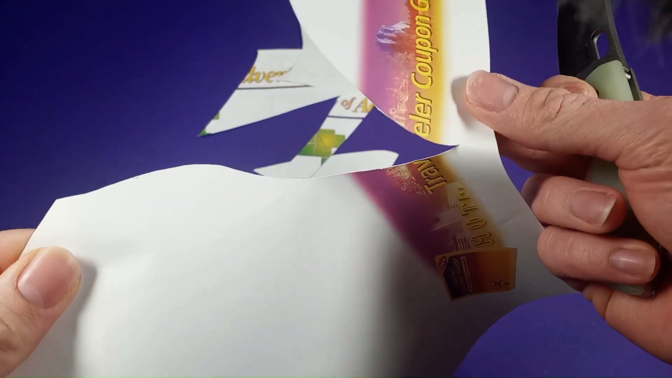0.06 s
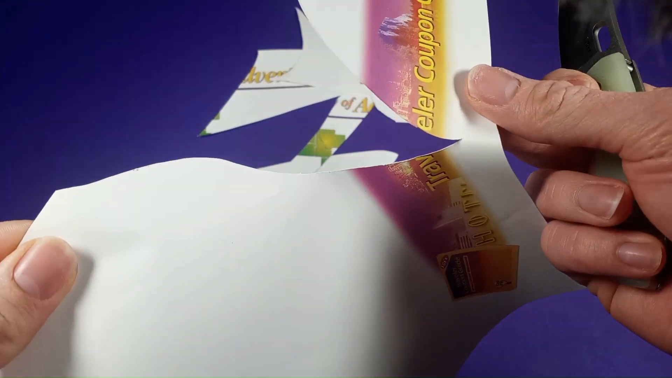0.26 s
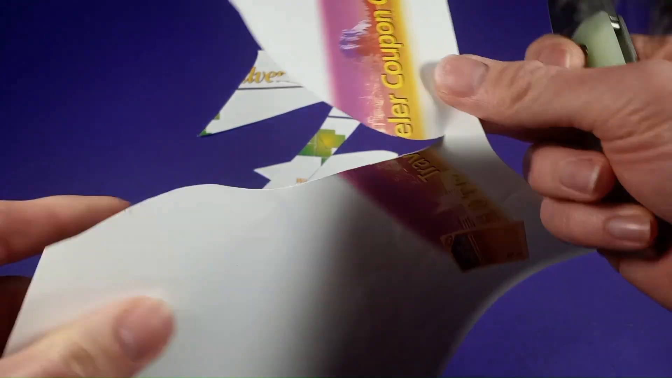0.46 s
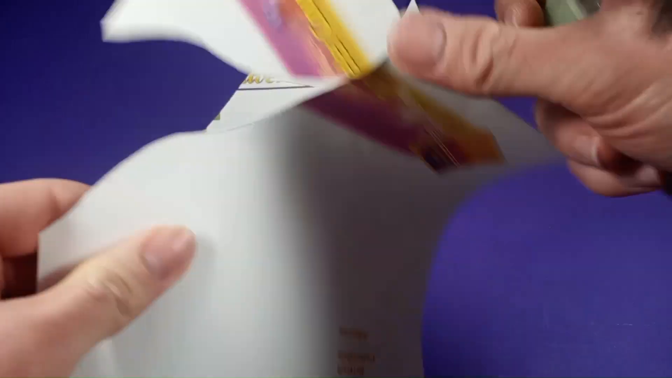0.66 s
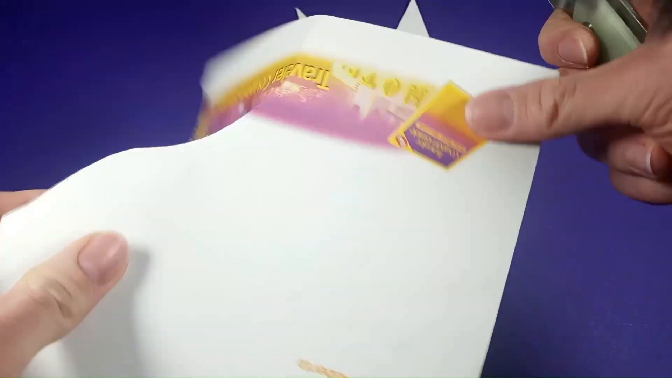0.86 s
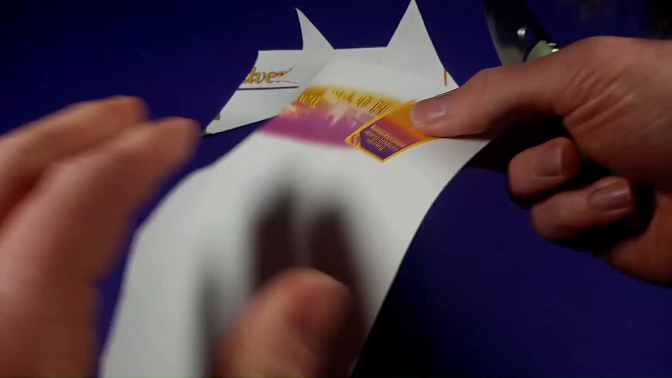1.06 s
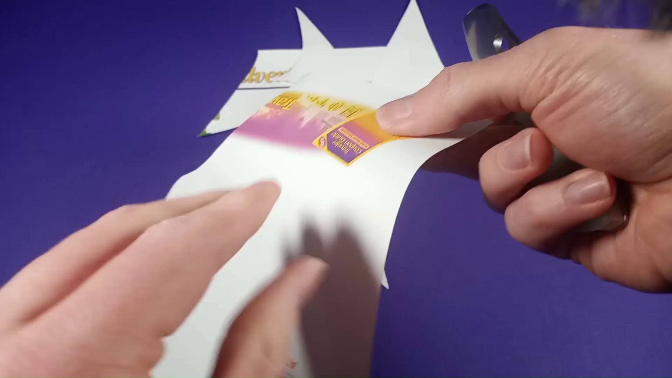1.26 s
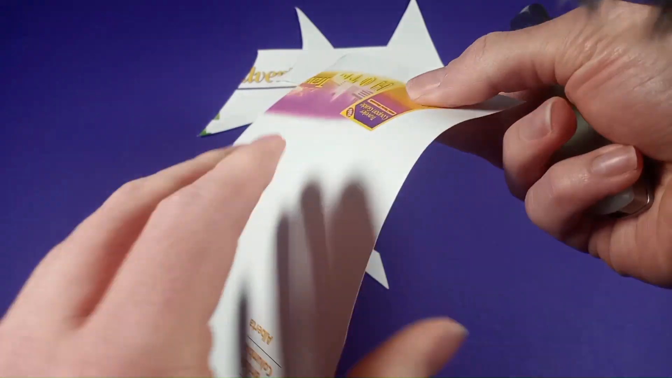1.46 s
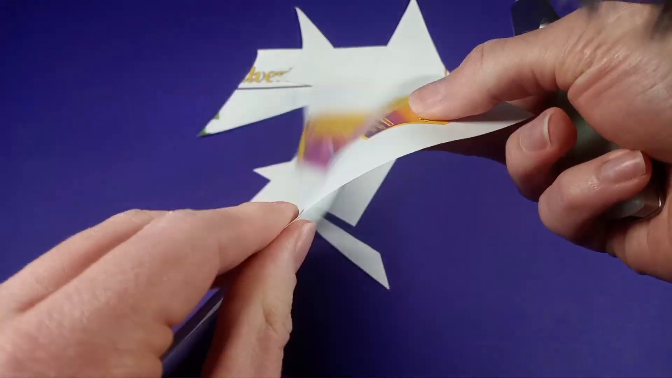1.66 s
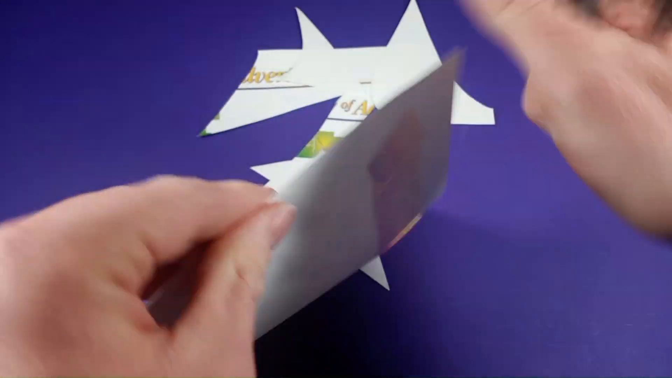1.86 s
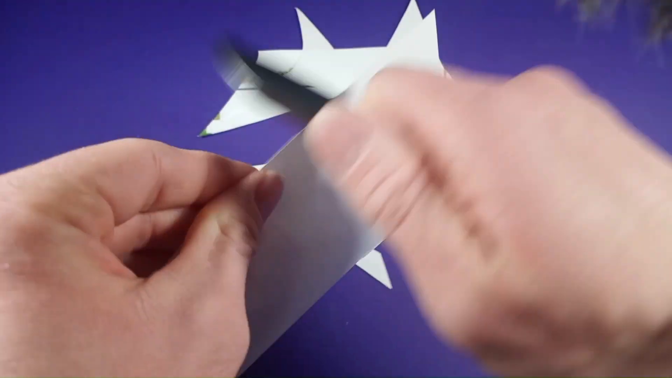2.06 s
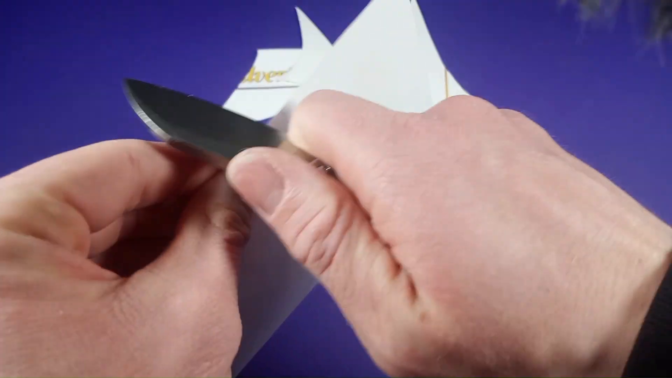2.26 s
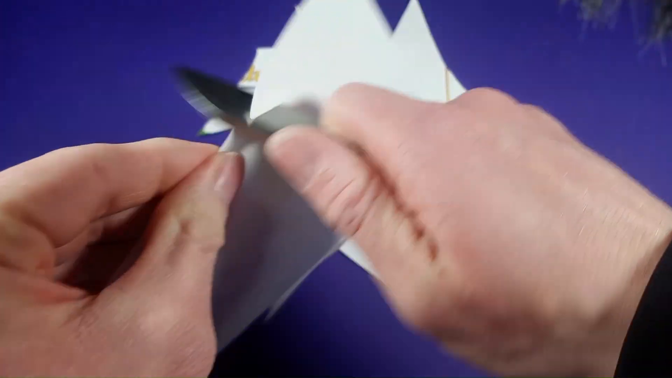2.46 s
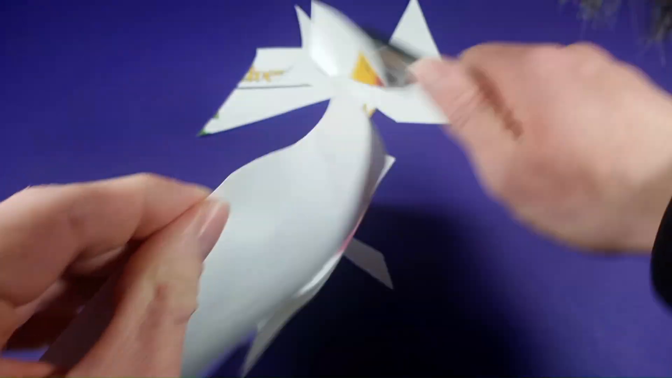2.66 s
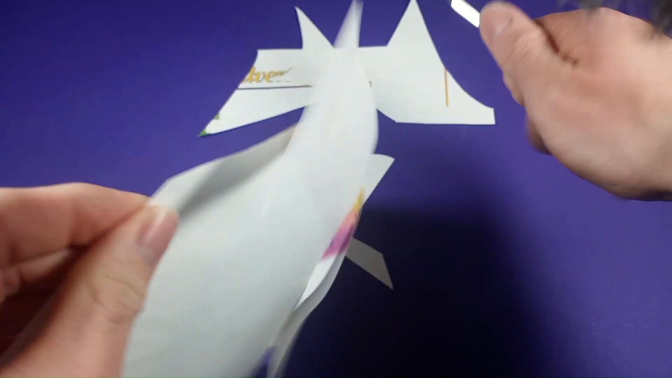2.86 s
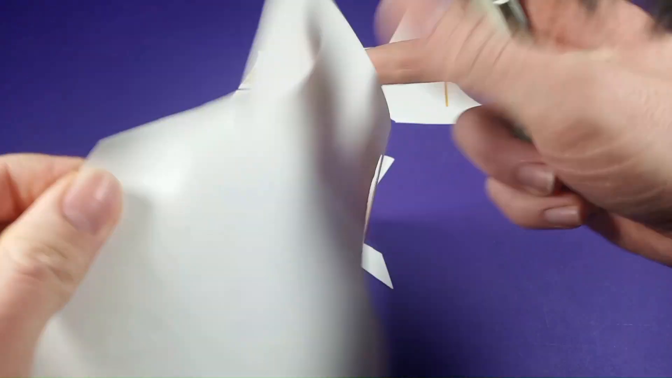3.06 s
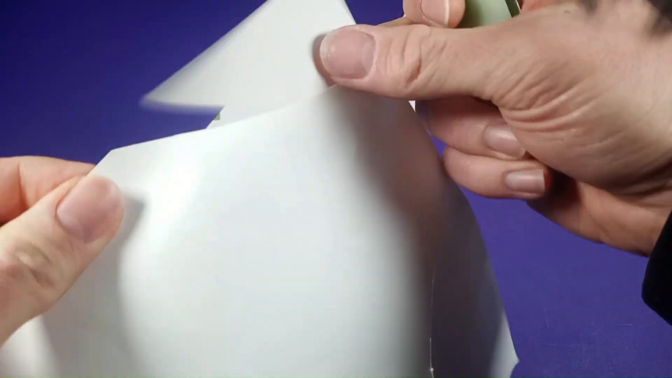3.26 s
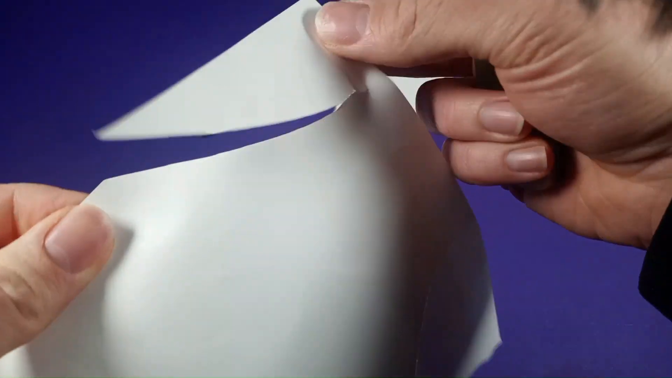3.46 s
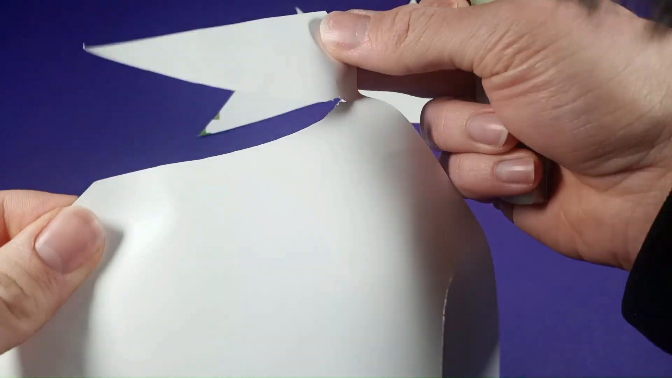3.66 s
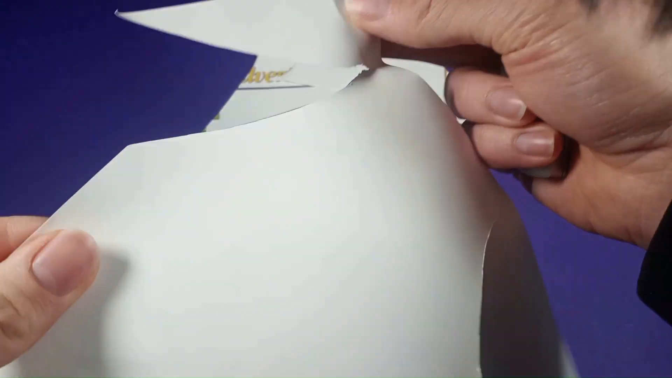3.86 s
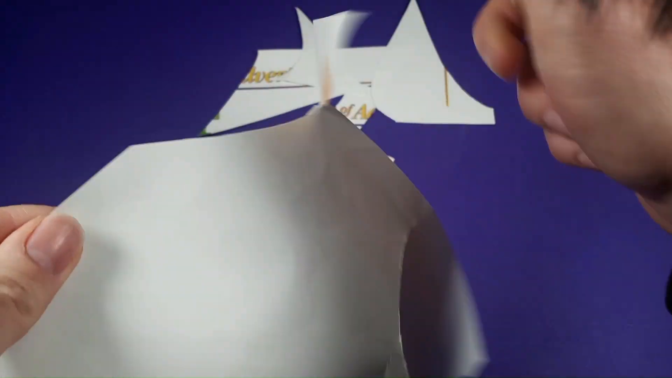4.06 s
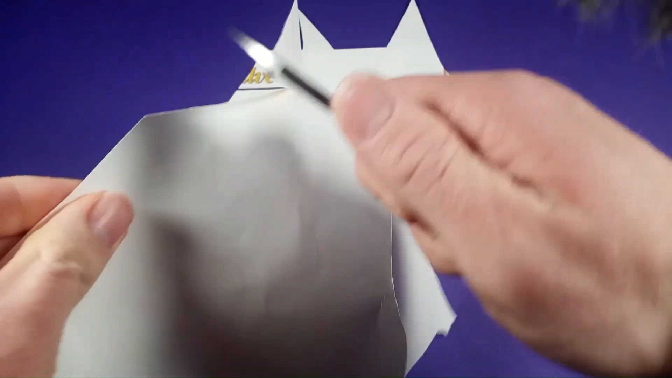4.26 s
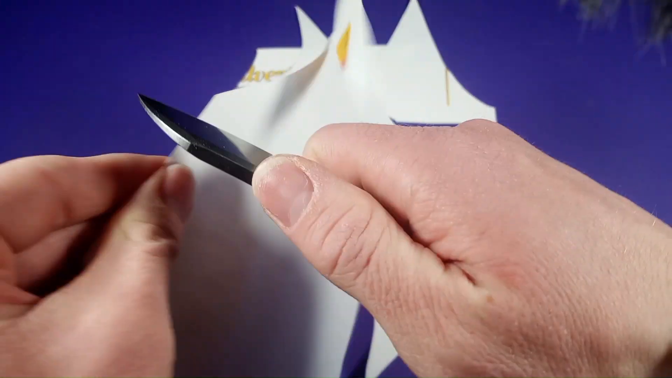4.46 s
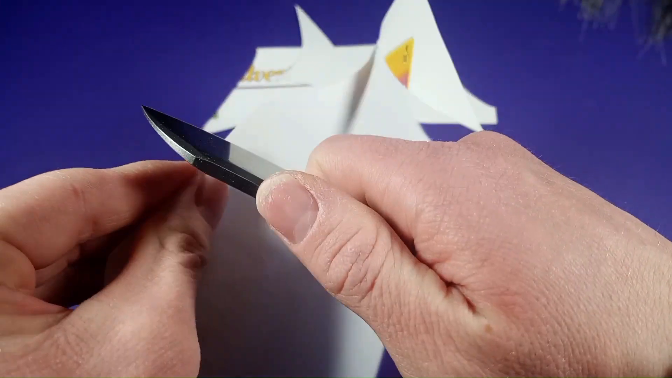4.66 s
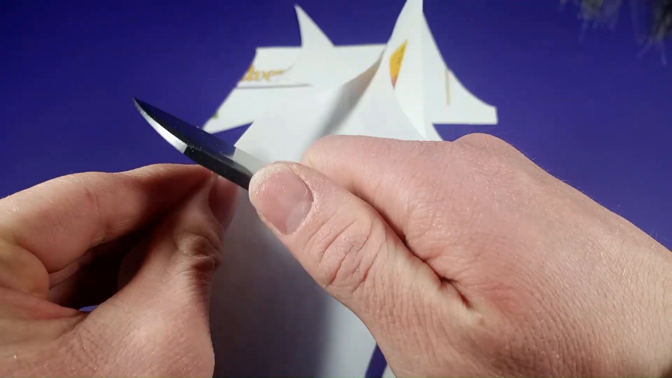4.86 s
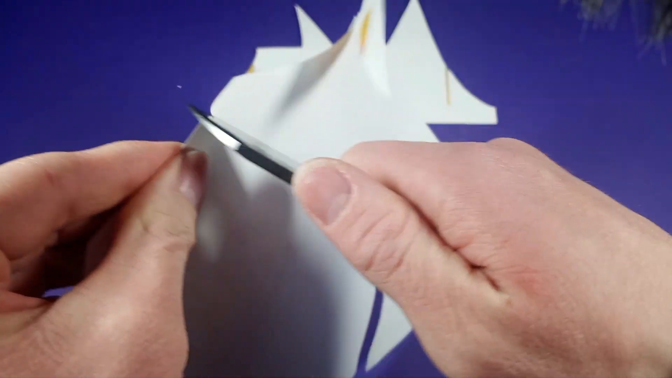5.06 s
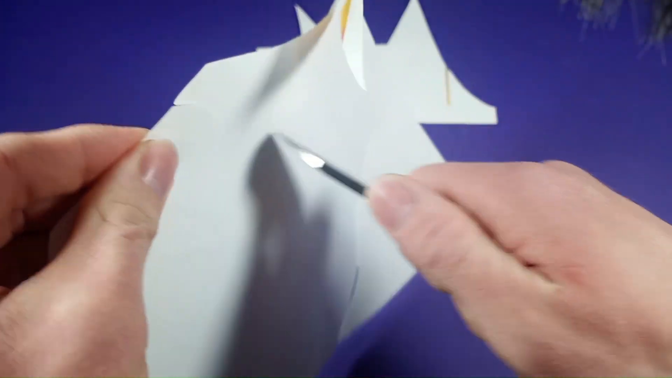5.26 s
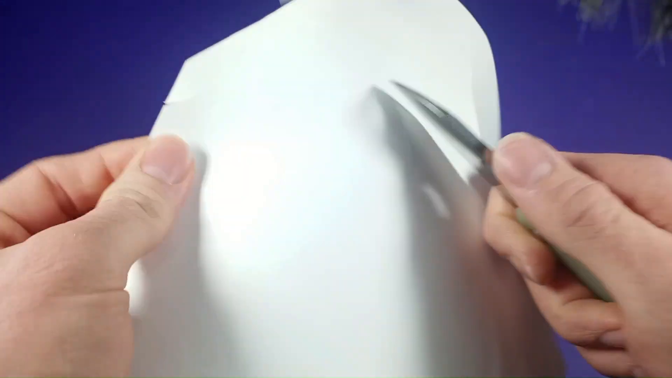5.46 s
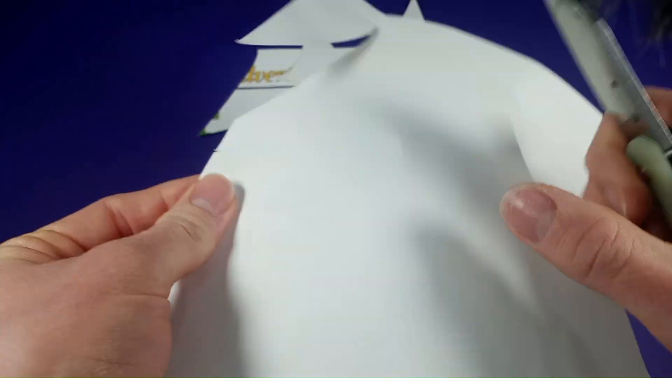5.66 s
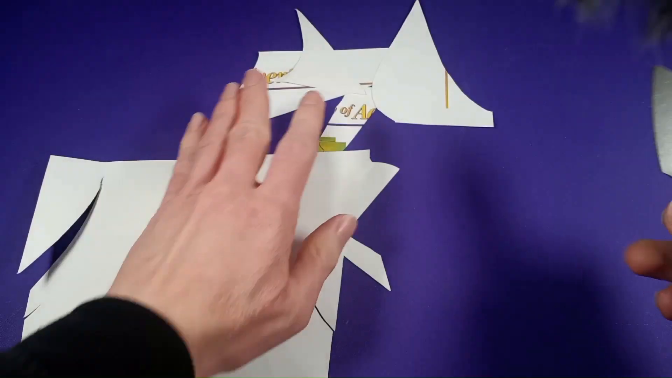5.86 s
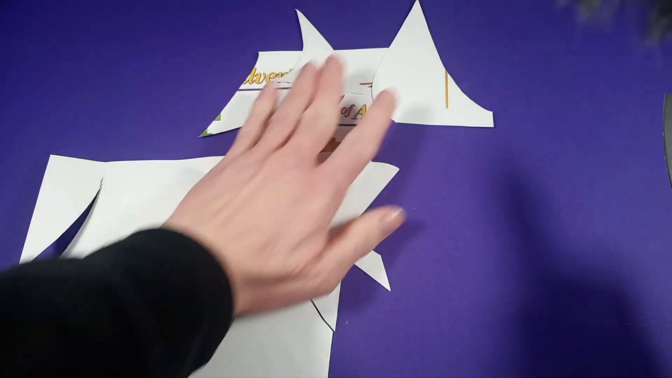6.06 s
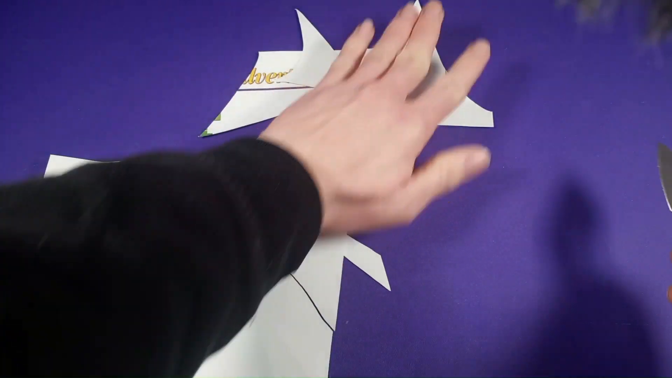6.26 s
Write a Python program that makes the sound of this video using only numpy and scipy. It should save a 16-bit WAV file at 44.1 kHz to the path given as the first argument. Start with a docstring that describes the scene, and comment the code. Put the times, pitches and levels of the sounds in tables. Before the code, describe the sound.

Very close in a small quiet room, a stiff paper sheet is bent and turned with crinkles and dry pops. A knife nicks it, then zips through in a bright, sinking rasp. More rustling and finger scuffs follow, then a second, softer quick slice, a cluster of thumpy paper snaps, and the sheet is pressed down, leaving near silence.

```python
"""A small, quiet room: a folding knife makes two quick slices through a hand-held sheet, close to the
microphone over a table. The edge snaps fibres by the thousand, heard as filtered random clicks with a sinking rasp.
Between the cuts fingers slide in fine stick-slip, and the sheet bends, buckles and flaps as it is turned
and laid down: kinks, snaps and low puffs of air. Faint brushing of the grip and room hush lie beneath."""
import sys
import numpy as np
from scipy import signal
from scipy.fft import rfft, irfft, next_fast_len
from scipy.io import wavfile

SR = 44100
rng = np.random.default_rng(int(sys.argv[2]) if len(sys.argv) > 2 else 0)


def pcm_store(signal):
    """Save signal as 16-bit PCM."""
    levels = np.round(np.clip(np.atleast_2d(signal), -1, 1) * 32767)
    wavfile.write(sys.argv[1], SR, levels.astype(np.int16).T)


N = 278271
T = np.arange(N) / SR
LONGEST = SR // 2  # longest single movement, in samples


BITE_S, THROUGH_S = 0.008, 0.012  # attack of a slice; time the edge takes to come free
THROUGH_DB, RUN_OUT_DB = -10.5, -30.5  # force just after that and at the end of the run-out
HISS_BODY_HZ, HISS_TOP_HZ = 850, 9000
RASP_OCTAVES = -0.89  # the paper slackens over the cut and the rasp sinks
DRUM_GROWTH_DB = 7.5  # rise of the drumming from bite to end of cut
# air stirred as the strip comes free, level relative to the slice
PARTING_LEAD_S, PARTING_S, PARTING_DB = 0.015, 0.18, -24

# Spectrum of the snapping fibres: frequency [Hz], density [dB per Hz]
FIBRE_SPECTRUM = [(100, -29), (350, -10.5), (800, -15.5), (1700, -1), (2250, -8), (2700, -2.5), (3200, -8),
                  (3800, -3.5), (5300, -6.5), (6600, -12), (8500, -20.5), (10000, -34), (13500, -43.5),
                  (15500, -36)]
# Spectrum of the drumming sheet: frequency [Hz], density [dB per Hz]
SHEET_SPECTRUM = [(40, -25.5), (100, -21), (350, -6.5), (800, -1.5), (1400, 0.5), (3000, -8), (8000, -45)]
# Strokes of the blade; in the first cut the tip nicks the sheet before the full edge enters.
# Columns: bite_s, cut_s, run_out_s [s]; level_db, swell_db over the stroke [dB];
# rasp_hz at the bite, before it wanders [Hz]; drum_db at the end of the cut, relative to the hiss [dB];
# echo_ms off the table [ms]; echo_strength [0-1]; body_db, top_db of the hiss [dB]
SLICES = [(2.298, 0.041, .04, -23, 2, 4060, -26, 0.83, 0.35, -12.5, -2.5),
          (2.348, 0.16, 0.098, -18.5, 2.5, 5000, -4, 0.31, 0.11, 2, 3.5),
          (4.897, 0.15, 0.05, -22.5, 2.5, 5140, -12.5, 0.686, 0.39, -0.5, -5.5)]


def slicing():
    """The edge snaps fibres in bunches; the sheet radiates each snap and drums as the blade tugs at it."""
    out = np.zeros(N)
    for (bite_s, cut_s, run_out_s, level_db, swell_db, rasp_hz, drum_db,
         echo_ms, echo_strength, body_db, top_db) in SLICES:
        t = np.arange(-BITE_S, cut_s + run_out_s, 1 / SR)
        progress = np.clip(t / cut_s, 0, 1)
        force_times = [-BITE_S, 0, cut_s, cut_s + THROUGH_S, cut_s + run_out_s]
        force = undb(np.interp(t, force_times, [-30, -swell_db, 0, THROUGH_DB, RUN_OUT_DB]))

        snaps = grains(LONGEST, rate=8000, spread_db=1.5)
        snaps = snaps * catch(LONGEST, rate=550, depth_db=1.5)
        snaps = snaps * catch(LONGEST, rate=63, depth_db=1.5)
        radiated = ring(snaps, t60=0.008, wet_db=-5.5)[:len(t)]
        fibres = unit(colour(radiated, FIBRE_SPECTRUM))
        hiss_tilt = [(HISS_BODY_HZ, body_db), (2 * HISS_BODY_HZ, 0),
                     (HISS_TOP_HZ / 2, 0), (HISS_TOP_HZ, top_db)]
        fibres = colour(fibres, hiss_tilt)

        # the paper right at the edge rings higher the tighter it is pulled
        edge_hz = rasp_hz * 2 ** (RASP_OCTAVES * progress) * catch(len(t), rate=40, depth_db=4.3)
        fibres = fibres + undb(7.0) * resonance(fibres, edge_hz, 1.2)

        drum_gain = undb(drum_db - DRUM_GROWTH_DB * (1 - progress))
        drumming = drum_gain * unit(colour(snaps[:len(t)], SHEET_SPECTRUM))
        sound = unit(fibres) + drumming
        # the echo off the table combs the sound
        echo = np.interp(t - echo_ms / 1000, t, sound)
        sound = (sound + echo_strength * echo) / np.hypot(1, echo_strength)
        add(out, bite_s - BITE_S, undb(level_db) * force * sound)

        parting_air = air(release(PARTING_S))
        add(out, bite_s + cut_s - PARTING_LEAD_S, undb(level_db + PARTING_DB) * parting_air)
    return out


# Spectrum of skin on paper, also used for the grip: frequency [Hz], density [dB per Hz]
SKIN_SPECTRUM = [(80, -5.5), (500, 6.5), (1500, 3.5), (4000, -5.5), (6500, -8.5), (8500, -20),
                 (10500, -30.5), (13500, -36.5), (15500, -21.5)]
# Steady slides of fingers or blade over the paper: start_s, length_s [s], level_db [dB], centre_hz [Hz]
RUBS = [(.45, 0.097, -45.5, 3340), (.535, 0.036, -45, 5007), (.57, 0.14, -42, 5300),
        (1.17, 0.077, -47.5, 3560), (1.31, 0.15, -58.5, 3820), (1.435, 0.1, -33, 3720),
        (1.8, 0.33, -57.5, 2230), (2.252, 0.081, -42, 3780), (2.825, 0.055, -50.5, 3480),
        (3.26, .13, -47.5, 3570), (3.39, 0.062, -54, 3080), (3.63, 0.23, -54, 5500),
        (3.97, 0.093, -59, 2860), (4.08, 0.072, -53, 3600), (4.47, 0.1, -58.5, 3460),
        (5.06, 0.031, -33.5, 5200), (5.17, 0.11, -52.5, 2600), (5.44, 0.21, -43.5, 4560),
        (5.594, 0.033, -26, 2800)]
# A finger grabs, skids and stops: start_s, length_s [s], level_db [dB], centre_hz [Hz]
SCUFFS = [(.25, 0.096, -52, 4100), (.587, 0.038, -43.5, 3970), (.955, 0.16, -56.5, 3350),
          (1.01, 0.075, -41, 1840), (1.082, 0.086, -44, 4040), (1.567, 0.065, -31.5, 3770),
          (2.608, 0.052, -28, 5550), (2.635, 0.18, -44.5, 3200), (3.09, 0.093, -40.5, 3000),
          (3.132, 0.16, -47.5, 3860), (3.568, 0.044, -42.5, 3430), (3.757, 0.13, -40, 4400),
          (4.157, 0.092, -37, 3570), (5.22, 0.1, -40, 3670), (5.637, 0.034, -34, 3840)]


def rubbing():
    """Fine stick-slip on the paper's grain; the held patch of sheet rings briefly."""
    out = np.zeros(N)
    for table, shape in (RUBS, swell), (SCUFFS, release):
        for start_s, length_s, level_db, centre_hz in table:
            force = shape(length_s)
            slips = grains(LONGEST, rate=7600, spread_db=1.0) * catch(LONGEST, rate=240, depth_db=5.0)
            patch = ring(slips, t60=0.016, wet_db=3)[:len(force)]
            skin = colour(patch, SKIN_SPECTRUM, centre_hz, q=0.9, floor_db=-20.0, peak_db=3)
            add(out, start_s, undb(level_db) * force * unit(skin))
    return out


RELAX_OCTAVES = 0.51  # kinks sink in pitch as a bend opens out
AIR_LINGER = 1.44  # the air moves this many times as long as the sheet

# Spectrum of creasing paper, also used for the buckles: frequency [Hz], density [dB per Hz]
CREASE_SPECTRUM = [(30, -15.5), (90, 20), (1000, 4.5), (4000, 0.5), (6500, -9), (10000, -32.5),
                   (15500, -34.5)]
# The sheet is bent by hand: start_s, length_s [s], level_db [dB], centre_hz midway [Hz], air_db [dB]
BENDS = [(.465, 0.059, -41, 780, -40), (.565, .15, -33.5, 860, -38.5), (.775, 0.055, -31, 1900, -54),
         (1.435, 0.15, -30.5, 1110, -47), (1.62, 0.11, -33, 1560, -51), (2.25, .075, -56, 300.3, -43.5),
         (2.85, 0.17, -64, 1300, -54.5), (3.125, 0.073, -39.5, 720, -38.5), (3.63, 0.041, -51, 407, -41),
         (3.735, 0.082, -35.5, 582, -39.5), (3.89, 0.13, -65.5, 740, -56.5), (5.215, 0.14, -34, 650, -35.5),
         (5.45, 0.22, -47, 1690, -51), (5.727, 0.08, -28.5, 700, -29.5)]
# The bent sheet springs back: start_s, length_s [s], level_db [dB], centre_hz midway [Hz], air_db [dB]
SPRINGS = [(.241, 0.064, -44, 670, -59.5), (.703, 0.05, -29.5, 820, -55), (.753, 0.13, -24, 900, -39.5),
           (1.01, 0.048, -40, 1700, -60), (1.522, 0.073, -22.5, 1820, -48), (1.708, 0.076, -39, 1700, -55),
           (2.175, 0.052, -39, 1180, -38.5), (2.943, 0.086, -43, 1145, -55), (3.092, 0.034, -46, 790, -57),
           (3.84, 0.12, -34.5, 880, -42), (4.131, 0.033, -41.5, 1240, -70), (4.16, 0.052, -43, 960, -74),
           (4.265, 0.065, -52.5, 608, -49.5), (5.036, 0.032, -34.5, 451, -42.5),
           (5.274, 0.026, -25.5, 1150, -37), (5.311, 0.055, -18, 1400, -39), (5.473, 0.1, -46, 325, -48)]


def bending():
    """Small kinks run through the sheet, higher the tighter the bend; each movement fans air."""
    out = np.zeros(N)
    for table, shape in (BENDS, swell), (SPRINGS, release):
        for start_s, length_s, level_db, centre_hz, air_db in table:
            force = shape(length_s)
            kinks = grains(LONGEST, rate=2200, spread_db=4.5) * catch(LONGEST, rate=130, depth_db=3.5)
            patch = ring(kinks, t60=0.014, wet_db=0)[:len(force)]
            tight_hz = centre_hz * 2 ** (RELAX_OCTAVES / 2)
            slack_hz = centre_hz * 2 ** (-RELAX_OCTAVES / 2)
            tight = colour(patch, CREASE_SPECTRUM, tight_hz, q=0.89, floor_db=-40.0, peak_db=2.0)
            slack = colour(patch, CREASE_SPECTRUM, slack_hz, q=0.89, floor_db=-40.0, peak_db=2.0)
            opened = np.linspace(0, 1, len(force))
            sound = unit(force * ((1 - opened) * tight + opened * slack))
            # however the kinks fall, together they release the energy of the bend
            force_rms = np.sqrt(np.mean(force ** 2))
            add(out, start_s, undb(level_db) * force_rms * sound)
            add(out, start_s, undb(air_db) * air(shape(AIR_LINGER * length_s)))
    return out


# The sheet buckles with a snap: time_s [s], level_db [dB], centre_hz [Hz],
# ring_s to fall 60 dB [s], mode_db height of the ringing mode [dB]
SNAPS = [(0.246, -37, 1740, 0.076, 6), (0.6742, -14, 1750, 0.024, 8.5), (.677, -17, 900, 0.094, 6),
         (1.101, -40.5, 4000, 0.022, 22), (1.4843, -17.5, 2520, 0.0054, 7), (1.512, -23, 3230, 0.0084, 0),
         (2.438, -25, 475.5, 0.034, 3), (2.4689, -15, 2700, 0.057, 3), (3.171, -23.5, 970, 0.056, -9),
         (3.513, -38, 1800, 0.044, 6), (3.8391, -21, 4770, 0.016, 14.5), (4.16, -30.5, 4120, 0.037, 15),
         (4.193, -32, 3370, 0.021, 9), (5.252, -16.5, 855, 0.028, 2), (5.277, -14.5, 235, 0.032, 2.5),
         (5.323, -15, 266, 0.045, 3), (5.7385, -24, 956, 0.032, -2), (5.763, -23, 2790, 0.075, -2.5),
         (5.776, -18, 810, 0.033, 7), (5.786, -29.5, 11000, 0.0067, 8)]


def buckling():
    """A bulge flips through: one sharp push, then a shiver that dies away."""
    out = np.zeros(N)
    t = np.arange(SR // 8) / SR
    for time_s, level_db, centre_hz, ring_s, mode_db in SNAPS:
        shiver = grains(len(t), rate=6000, spread_db=2.5) * np.exp(-np.log(1000) * t / ring_s)
        push = 1.2 * shiver / np.linalg.norm(shiver)
        push[0] += 1
        sound = colour(push, CREASE_SPECTRUM, centre_hz, q=0.62, floor_db=-26.0, peak_db=mode_db)
        # the level is that of the whole snap's energy spread over 2.8 ms
        sound = sound * np.sqrt(0.0028 * SR) / np.linalg.norm(sound)
        add(out, time_s, undb(level_db) * sound)
    return out


# Spectrum of moving air: frequency [Hz], density [dB per Hz]
AIR_SPECTRUM = [(25, -27.5), (48, -18), (72, -1), (130, 0.5), (220, -6.5), (450, -21), (1500, -66)]


def air(force):
    """A swing of the sheet sends a few uneven puffs of air."""
    puffs = grains(LONGEST, rate=800, spread_db=5.0) * catch(LONGEST, rate=96, depth_db=2.5)
    return force * unit(colour(puffs, AIR_SPECTRUM)[:len(force)])


ROOM_DB = -76.5
# Spectrum of the room's hush: frequency [Hz], density [dB per Hz]
ROOM_SPECTRUM = [(30, -6.5), (150, 5), (400, -2), (1500, -17), (3000, -18), (6000, -11), (9000, -32),
                 (15500, -35.5)]
# Level curve of the grip's faint brushing: time_s [s], level_db [dB]
GRIP = [(0, -63.5), (.8, -67.5), (1.85, -66.5), (2.8, -64), (4.1, -64), (4.7, -69.5), (5.7, -68),
        (5.82, -76)]


def background():
    """Skin brushing faintly on the sheet, as fine clicks, over the hush of the room, as steady noise."""
    brush = grains(N, rate=21000, spread_db=5.5) * catch(N, rate=45, depth_db=3.5)
    skin = unit(colour(brush, SKIN_SPECTRUM, 2600, q=1.0, floor_db=-7.0))
    grip = undb(np.interp(T, *np.transpose(GRIP))) * skin
    hush = unit(colour(rng.standard_normal(N), ROOM_SPECTRUM))
    return grip + undb(ROOM_DB) * hush


def swell(length):
    """Force of a steady movement: it builds up, peaks 46% of the way through and lets go."""
    t = np.arange(0, length, 1 / SR)[:LONGEST]
    return np.interp(t / length, [0, 0.46, 1], [0, 1, 0]) ** 0.59


def release(length):
    """Force of a sudden movement: it peaks within 5 ms, then dies away."""
    t = np.arange(0, length, 1 / SR)[:LONGEST]
    return np.interp(t, [0, 0.005, length], [0, 1, 0]) ** 1.44


def grains(size, rate, spread_db):
    """Tiny clicks of random sign at random moments, rate per second, most small and a few large."""
    hit = rng.random(size) < rate / SR
    sign = rng.choice([-1, 1], size)
    return hit * sign * undb(spread_db * np.clip(rng.standard_normal(size), -2, 2))


def catch(size, rate, depth_db):
    """Uneven gain of a contact that catches and lets go, with rate new random levels per second."""
    step = np.arange(size) * rate / SR
    count = int(step[-1]) + 2
    return undb(depth_db * np.interp(step, np.arange(count), rng.standard_normal(count)))


def ring(x, t60, wet_db):
    """Add a dense tail of reflections that falls 60 dB in t60 seconds."""
    t = np.arange(int(t60 * SR) + 2) / SR
    tail = rng.standard_normal(len(t)) * np.exp(-np.log(1000) * t / t60)
    return x + undb(wet_db) * signal.fftconvolve(x, tail / np.linalg.norm(tail))[:len(x)]


def resonance(x, hz, q):
    """Band-pass whose centre moves: fades between fixed resonances a third of an octave apart."""
    out = 0
    for centre in 1000 * 2 ** (np.arange(2, 11) / 3):
        share = np.maximum(1 - 3 * abs(np.log2(hz / centre)), 0)
        out = out + share * signal.lfilter(*signal.iirpeak(centre, q, fs=SR), x)
    return out


def colour(x, points, hz=None, q=1., floor_db=-30, peak_db=0):
    """Causal filter with the given spectrum; at hz, a broad hump topped by the sheet's strongest mode."""
    size = 2 * next_fast_len(len(x) // 2 + 2048)
    f = np.maximum(np.arange(size // 2 + 1) * SR / size, 1)
    at, db = np.transpose(points)
    gain = undb(np.interp(np.log(f), np.log(at), db))
    if hz:
        detune = f / hz - hz / f
        hump = 1 / (1 + (q * detune) ** 2) + undb(floor_db)
        mode = undb(peak_db / (1 + (5 * detune) ** 2))
        gain = gain * hump * mode
    # folding the cepstrum gives minimum phase: nothing sounds before its click
    cepstrum = irfft(np.log(gain))
    cepstrum[1:size // 2] *= 2
    cepstrum[size // 2 + 1:] = 0
    return irfft(rfft(x, size) * np.exp(rfft(cepstrum)), size)[:len(x)]


def undb(db):
    """Decibels to amplitude."""
    return 10 ** (np.asarray(db) / 20)


def unit(x):
    """Scale to rms 1."""
    return x / np.sqrt(np.mean(x ** 2) + 1e-20)


def add(out, s, x):
    """Mix x in at time s, in seconds."""
    i = max(int(s * SR), 0)
    out[i:i + len(x)] += x[:N - i]


LAID_FLAT_S = 5.789


def scene():
    """The paper in its small room; pressed flat on the table, it drops 38 dB within 2.7 ms."""
    paper = slicing() + rubbing() + bending() + buckling()
    pressed = undb(np.interp(T, [LAID_FLAT_S, LAID_FLAT_S + 0.0027], [0, -38]))
    in_room = ring(paper, t60=0.15, wet_db=-14.5)
    return (in_room * pressed + background())[None]


def record(dry):
    """The recorder steeply cuts the top above 15.9 kHz."""
    return signal.sosfilt(signal.ellip(10, 0.2, 70, 15900, fs=SR, output="sos"), dry)


dry = scene()
out = record(dry)
pcm_store(out)
```